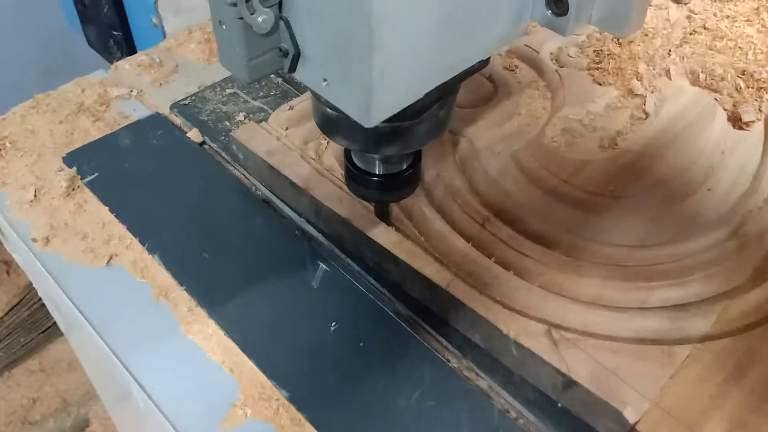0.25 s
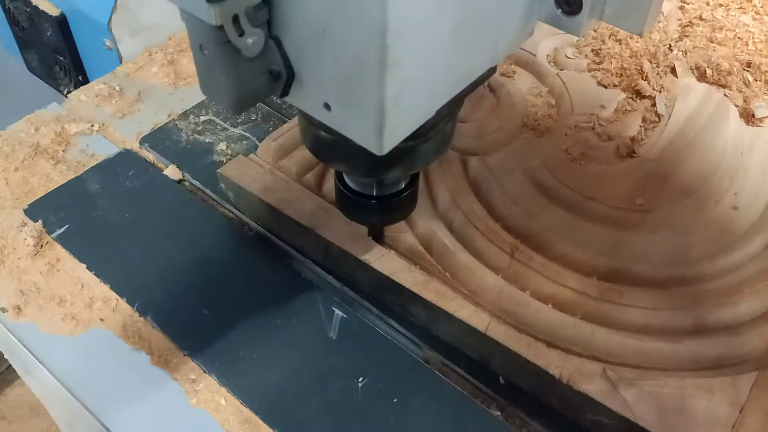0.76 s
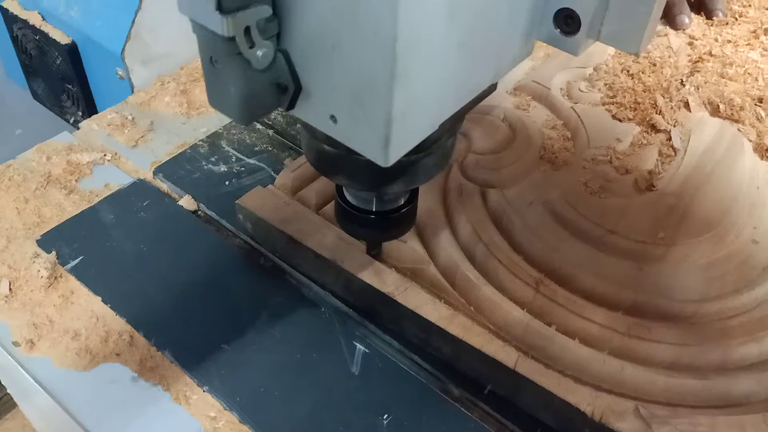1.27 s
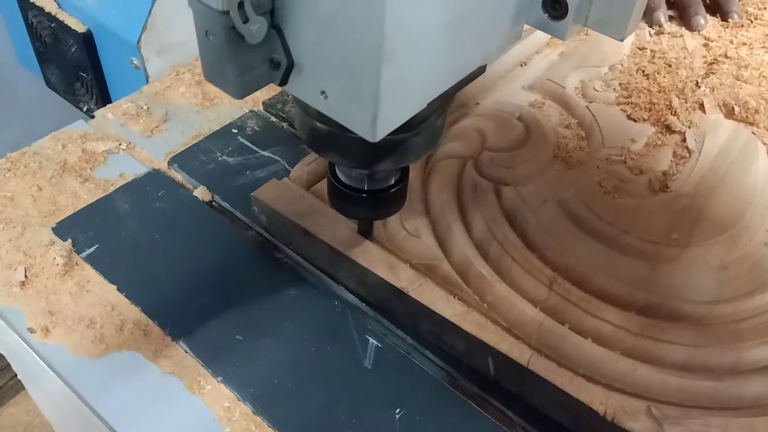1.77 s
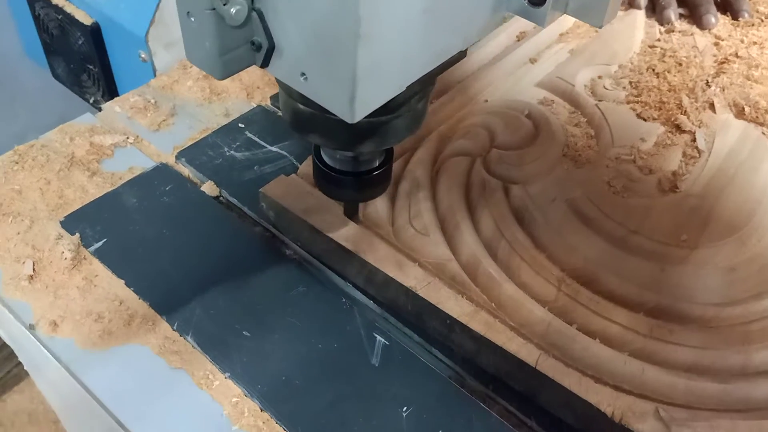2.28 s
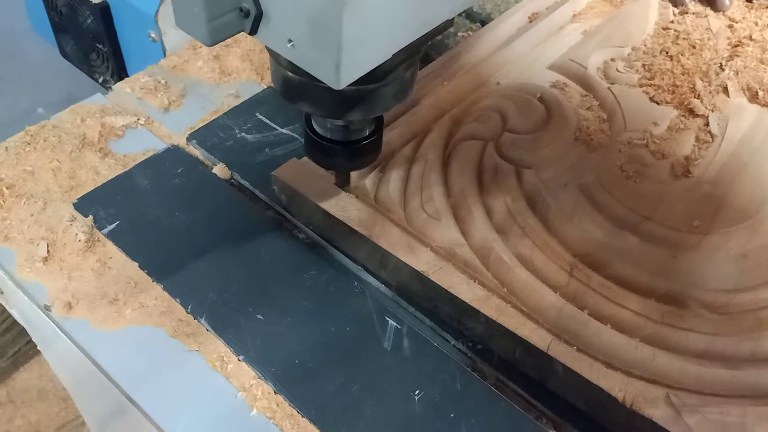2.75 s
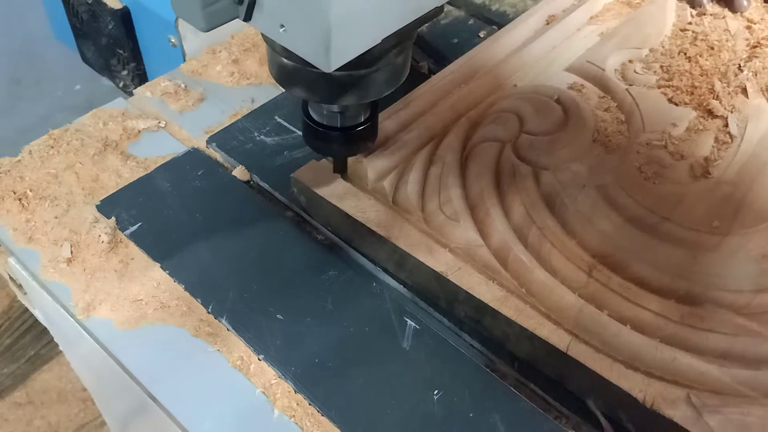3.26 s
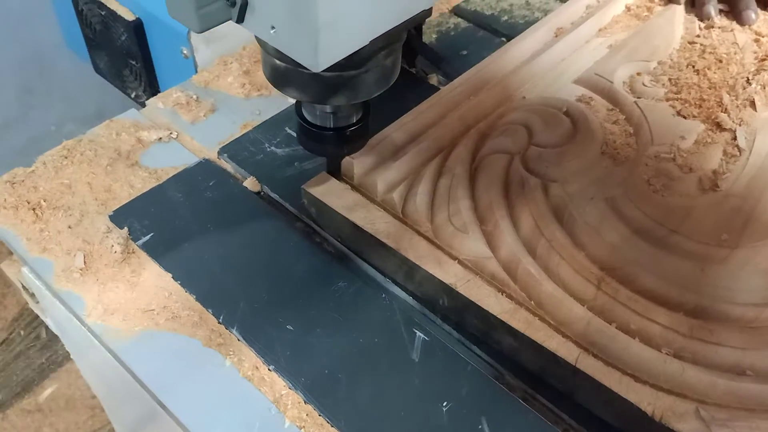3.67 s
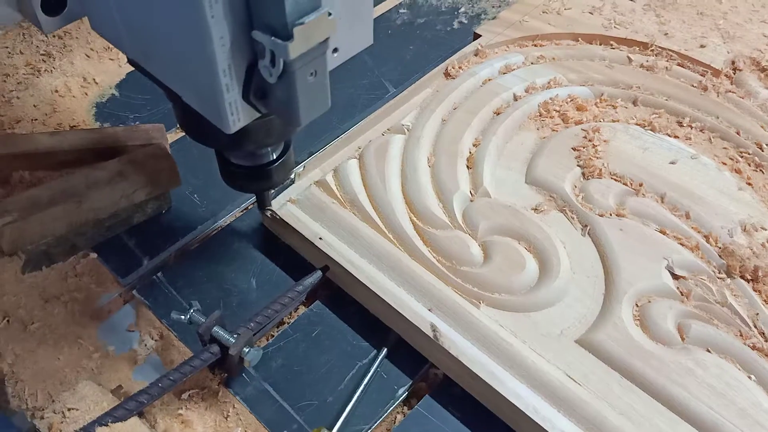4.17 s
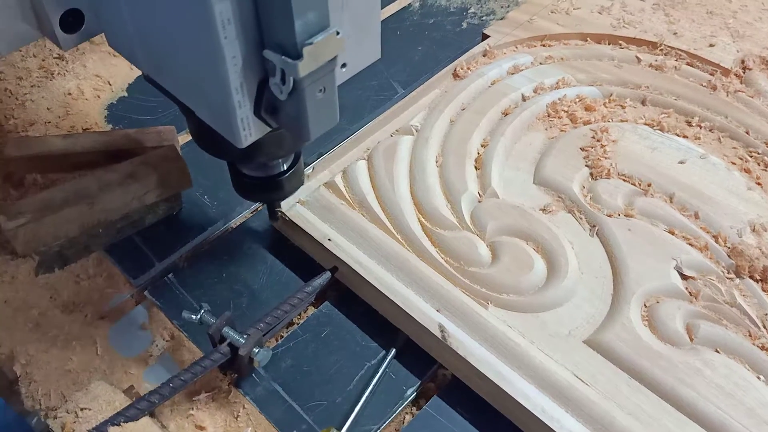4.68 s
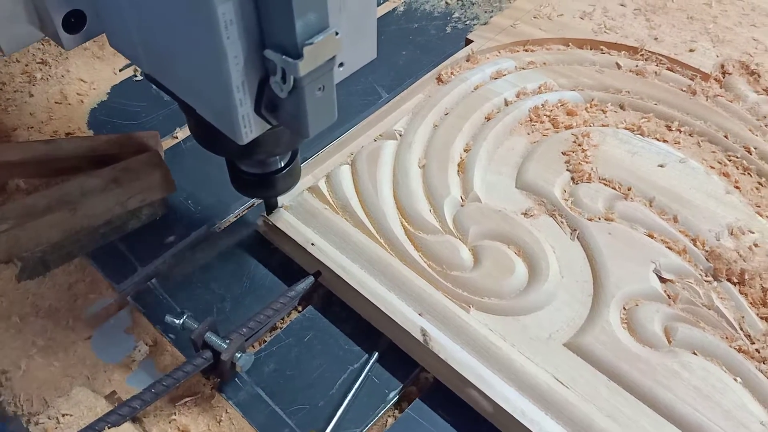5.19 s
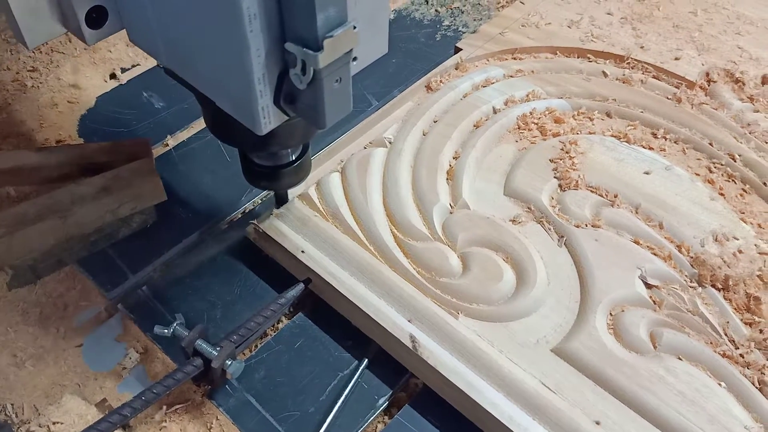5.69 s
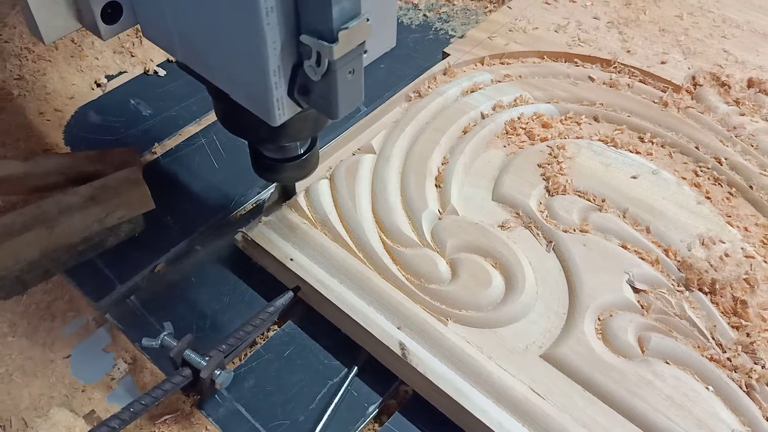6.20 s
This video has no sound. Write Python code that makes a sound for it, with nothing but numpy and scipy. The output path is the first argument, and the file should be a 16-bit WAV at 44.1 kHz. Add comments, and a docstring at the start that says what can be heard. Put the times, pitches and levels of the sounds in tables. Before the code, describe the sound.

Close stereo microphone at a wood-carving router. A hard, steady buzzing whine with tearing hiss cuts a board; the left side is muffled until it suddenly opens up. A thin squeal builds, sharp clicks with low thuds mark the bit breaking free, and the spindle spins quietly with airy hiss. Then it stutters into a second board and resumes a rough whine.

```python
"""A router spindle whines at the microphone's two ports, turning about 300 times a second: sine multiples
of the turn rate. Its two-fluted bit cuts the edge of a board, lifts clear, then plunges into a second board.
Under the whine, bands of noise make the hiss of motor air and torn fibres; resonances ring in board and housing.
A squeal, short clicks with low thuds and faint steady tones are added.
A finger covers the left port at first and then slides off, which brings that side's treble back."""
import sys
import numpy as np
from scipy import signal
from scipy.io import wavfile

SR = 44100
rng = np.random.default_rng(int(sys.argv[2]) if len(sys.argv) > 2 else 0)


def store_pcm(level_fs):
    """Save levels as 16-bit WAV."""
    pcm = np.round(np.clip(level_fs, -1, 1) * 32767).astype(np.int16)
    wavfile.write(sys.argv[1], SR, np.atleast_2d(pcm).T)


N = 284004
COARSE_S = np.arange(0, N + 40, 40) / SR    # time grid of the slow controls
SECOND_BOARD_S = 4.3    # from here on the second board's settings hold
CUTOFF_HZ = 15600       # top of the microphone's range
ROUGH_DB = 0.47         # spread of the fast flutter of every multiple

# Spindle speed, faster when free: (t/s, turn rate/Hz)
SPIN = [(0, 299.2), (3.7, 299.05), (3.85, 299.8), (4.7, 299.8), (4.73, 299.1), (6.44, 299.05)]


def spindle_angle():
    """The turn rate summed to an angle in rad, so that all multiples stay locked to one shaft."""
    return 2 * np.pi * np.cumsum(fine(in_time(SPIN))[0]) / SR


# Tooth pass, twice a turn, as each port hears it: (t/s, rms level/dB, left-right/dB, lag in the right port/rad)
TOOTH_PASS = [(0, -40, -27, 4), (.4, -37.5, -20, 1), (.55, -29, -14.5, 0.5), (1.3, -26, -8.5, 0),
              (1.6, -21, -1, 0.5), (2.0, -23.5, 0.5, 0.8), (2.45, -22, 0.1, 0.58), (3.67, -24.5, 0.5, 0.6),
              (3.7, -27, 2.5, 1.3), (3.8, -37.5, 5, -1.2), (3.86, -47.5, 4, -1), (4.05, -42, 1, 0.7),
              (4.69, -44, -3, -1), (4.705, -39, -2, 3), (4.722, -28, 0, 0.5), (4.74, -38, 1, -1),
              (4.752, -27, 1, 0.8), (4.777, -27.5, -1, 0), (4.793, -35, 2, 1.5), (4.815, -28.5, -1, -0.3),
              (4.838, -27, 2, 0), (4.865, -26, 0, -0.5), (4.9, -26.5, 0, -0.8), (4.925, -42, 3, 0),
              (4.95, -39, -18, -5), (4.985, -34, 3, -2), (5.0, -35, -4, -1), (5.012, -26, -6, -2),
              (5.025, -38, -8, -2), (5.038, -27, -9, -2), (5.052, -34, 4, -3.5), (5.11, -33, -7, -2),
              (5.4, -36, -6.5, -3), (5.7, -35.5, -10.5, -2.5), (5.79, -33.5, -3, -5), (5.94, -34, -7, -5),
              (6.1, -32, -3, -5), (6.44, -31, -3, -6)]


def tooth(turn):
    """The two flutes strike once a turn each, which gives the strongest line at twice the turn rate."""
    db, pan_db, lag = in_time(TOOTH_PASS)
    gain = from_db(db + ROUGH_DB * drift(32.0) + pan_db / 2 * [[1], [-1]])
    phase = 0.031 * drift(47) - lag * [[0], [1]]
    return np.sqrt(2) * fine(gain) * np.sin(2 * turn + fine(phase))


# How hard the bit bites, through full cut, lift, free run, plunge and first heavy pass:
# (t/s, level from a full cut/dB)
BITE = [(0, 1.2), (3.55, -0.5), (3.72, -2.5), (3.86, -9.5), (4.0, -41), (4.7, -20), (4.715, -3),
        (4.893, -5), (4.912, 5), (5.08, 3), (5.3, 0), (6.44, -1)]


def bite_db():
    """Strength of the cut over time, shared by whine, torn fibres and board."""
    return in_time(BITE)[0]


# How the lag in the right port creeps as the head travels:
# (multiple, rate on the first board/rad per s, rate on the second board/rad per s)
LAG_CREEP = [(1, 0, -0.3), (4, -0.7, -0.5), (5, -0.46, 1.1), (6, 2, -0.8), (7, 4.5, .2), (8, 0.5, 0.1),
             (9, -0.7, 2), (10, -1.9, 0.5), (11, 1.5, -1.5), (12, -1, -0.2), (13, 2, -2.2), (14, 1, 0),
             (15, -1, -0.36)]
# Travel from the middle of each pass: (t/s, time past the middle/s)
PASS_TIME = [(0, -.9), (1.7, -.9), (3.7, 1.1), (4.3, 1.1), (4.31, -.7), (4.9, -.7), (6.44, .84)]


def lag_creep(multiple, second):
    """Lag in rad that one multiple gains or loses as the head travels along the board."""
    lag = 0
    for m, first_rate, second_rate in LAG_CREEP:
        if round(m) == multiple:
            lag = lag + np.where(second, second_rate, first_rate) * in_time(PASS_TIME)[0]
    return lag


# One multiple swells or sinks for a while as the bit travels:
# (peak t/s, multiple, rise/s, fall/s, gain/dB, left-right/dB)
TRAVEL_SWELLS = [(0.0, 1, 0.05, 0.21, 3, 1), (0.0, 8, 0.05, 0.27, 6, -13), (.1, 11, 0.23, 0.44, 4, 0),
                 (.3, 5, 0.23, 0.27, 4, -7), (.7, 14, .4, .3, 5, -2), (.8, 12, 0.45, 0.24, 9, 7),
                 (0.15, 4, 0.82, 0.61, 3, 0), (0.4, 6, 0.91, 0.31, 11.5, 2), (0.5, 10, 0.74, 0.32, 7.5, -2),
                 (0.552, 3, 0.42, 0.48, 5, -4.5), (0.68, 13, 0.1, 0.45, 10.5, 0.5),
                 (.4, 17, 0.35, .4, 4, -7), (.4, 19, 0.28, 0.8, 4.5, -1), (0.65, 18, 0.9, 0.35, 4, -4),
                 (0.9, 10, 0.2, 0.13, -11, -2), (1.051, 7, 0.74, 0.34, 5, -4),
                 (1.052, 8, 0.46, 0.36, -13, 11), (1.5, 14, 0.55, .9, -15, -9), (.4, 12, 0.58, .5, 5.5, 1),
                 (1.45, 13, 0.56, 0.47, 4, -7.5), (1.3, 1, 0.93, 0.9, -9, 8), (1.45, 6, 0.67, 1, -3, 19),
                 (1.5, 12, 0.33, 1.7, 6, -10), (1.6, 8, 0.21, 1.1, 8.5, 0), (1.75, 8, 0.14, .08, 2.5, -2),
                 (1.7, 12, 0.16, 0.81, 0, -3), (1.899, 8, 0.1, 0.64, -11, -30),
                 (2.0, 1, 0.42, 0.61, -8.5, -18), (2.0, 4, 0.31, 0.44, -3, .1),
                 (2.05, 5, 0.51, 1.1, -9, -20), (2.3, 8, 0.24, 0.25, -2, -3), (2.4, 13, .4, 0.53, 1.5, -2),
                 (2.5, 6, 0.4, .3, -0.5, -5), (2.7, 5, 0.6, .6, 7.5, 1), (2.9, 10, 0.16, 0.46, 5, 5),
                 (3.2, 9, .6, 0.26, -5, 8), (3.5, 5, .3, .2, 5, -7), (3.5, 15, 0.36, .3, 0, 2),
                 (2.3, 17, 0.54, 1.8, -17, -20), (2.4, 7, 0.37, 0.56, -4, -6),
                 (2.5, 13, 0.52, 0.32, 1, 7.5), (2.55, 12, 0.13, 1.1, -10, 6), (2.7, 10, 0.46, 0.24, 5, 1),
                 (2.95, 6, 0.44, 0.56, 6, -3), (2.95, 8, 0.72, 0.79, 4, 10), (3.5, 10, 0.42, 0.39, -12, 11),
                 (3.5, 13, 0.41, 0.27, -16, -3), (3.6, 9, 0.52, 0.33, -9, 5), (3.55, 12, 0.33, .15, -3, 3),
                 (3.3, 7, 0.27, 0.27, 3.5, 3), (3.3, 10, 0.17, 0.074, 2, 1), (3.82, 6, 0.067, 0.018, 12, 6),
                 (3.85, 11, 0.15, 0.12, 20, 11), (3.775, 11, .025, .08, 10, .1), (3.8, 14, .15, .2, 8, .1),
                 (3.85, 4, 0.73, 0.044, -5.5, 10), (3.95, 1, 0.16, 0.18, 10, 4),
                 (4.4, 1, 0.35, 0.22, -3.5, 15), (4.73, 9, 0.027, 0.69, 8.5, 7),
                 (4.74, 1, 0.057, 0.19, 10.5, 6), (4.8, 4, 0.2, 0.24, -9.5, 11),
                 (4.85, 3, 0.15, 0.038, 4, -9), (4.84, 8, 0.04, 0.045, 4.5, -2), (4.97, 8, .04, .06, 2, .1),
                 (1.59, 8, .02, .05, 3, .1), (4.88, 1, 0.086, 0.042, 6, 6), (4.89, 13, 0.033, 0.047, 7, 3),
                 (4.91, 8, 0.02, 1.4, 9.5, 3.5), (4.9, 11, 0.03, 0.053, -3, -7),
                 (4.885, 12, 0.02, 0.061, 15.5, 4), (4.9, 6, .05, .2, -1.5, -7),
                 (4.97, 14, 0.027, 0.28, 2.5, -2), (4.92, 9, 0.046, 0.095, -13, -2),
                 (5.02, 13, 0.066, 0.19, 7, -3), (5.05, 8, 0.22, 0.14, 3, 0),
                 (4.72, 8, .012, 0.016, 10, .1), (4.755, 8, 0.012, 0.024, 9, .1),
                 (4.98, 4, 0.027, .04, 6, 1), (5.25, 9, 0.13, 0.18, 6.5, 4), (5.25, 7, 0.13, .15, -3.5, -2),
                 (5.199, 5, 0.12, 0.33, 3.5, 4), (4.95, 3, 0.06, 0.26, -17, 11),
                 (4.95, 10, 0.39, 0.32, 5.5, -3), (5.0, 14, 0.38, 0.44, 4, 1),
                 (5.08, 9, 0.11, 0.38, 4.5, -2), (5.1, 15, 0.16, 0.23, 4, 3),
                 (5.18, 12, 0.27, 0.07, 8.5, -1), (5.1, 4, 0.17, .25, -1, 6.5),
                 (6.0, 4, 0.36, 0.57, 2.5, -1), (5.2, 6, 0.14, 0.11, -9, 4),
                 (5.43, 14, 0.029, 0.022, 13, 0.1), (5.45, 11, 0.039, 0.22, -3.5, -23),
                 (5.5, 4, 0.5, 0.47, 4.5, 3.5), (5.5, 8, 0.13, 0.079, -7.5, 2.7),
                 (5.55, 14, 0.13, 0.52, -10.3, -5), (5.65, 15, .1, .12, 2, -2), (5.8, 16, .07, 0.08, 5, .1),
                 (5.25, 15, .1, .08, 6, .1), (6.05, 11, 0.093, .2, 1, -1), (5.62, 8, .07, 0.18, 0, .1),
                 (5.8, 10, 0.088, 0.34, -4, -13), (5.95, 13, 0.27, 0.13, -21, 3),
                 (6.0, 6, 0.4, 0.52, 8, -3.5), (6.08, 13, 0.057, 0.5, 1, 0), (6.1, 12, 0.091, 0.13, 5, 1.5),
                 (6.15, 10, 0.1, 1.3, -3.5, 14), (6.17, 16, 0.097, 0.26, 3, 2),
                 (6.301, 8, 0.26, 0.39, -11, 15), (6.3, 17, 0.15, 0.5, -1, 9),
                 (6.35, 7, 0.39, 1.3, -5.5, -6), (1.7, 10, .15, 0.29, -7, -2), (1.8, 15, .3, .5, -11, -3),
                 (1.7, 19, .15, .2, 6, .1), (1.7, 20, .2, .3, -6, .1), (2.9, 15, .5, .4, 5, 2),
                 (2.9, 17, .5, .5, 6, .1), (2.7, 23, 1.0, .8, -6, 1), (4.8, 7, 0.15, .12, -8, -4),
                 (4.8, 6, .1, .1, -6, .1), (4.8, 10, .08, .08, 6, 1), (5.0, 10, 0.12, .3, -4, .1),
                 (4.78, 15, .06, .1, 4, .1), (5.0, 16, 0.22, .45, -5, .1), (5.4, 15, .25, .4, 4, 1),
                 (5.2, 18, .15, .15, 4, .1), (5.4, 13, .12, 0.11, -5, .1), (5.45, 17, .25, 0.71, -4, 2),
                 (5.6, 16, .15, .15, -7, .1), (5.6, 20, .3, .2, 4, .1), (6.3, 6, .2, .4, 3, -0.5),
                 (6.3, 11, .2, .4, -5, .1), (6.3, 12, .2, .4, 6, .1), (6.3, 19, .15, .3, 5, .1),
                 (6.15, 22, .08, .3, 7, .1), (6.4, 23, .15, 0.18, 8, .1), (6.15, 16, .06, .1, 3.5, 1),
                 (6.3, 18, .15, .3, -5, .1), (1.05, 12, .3, .25, 5, .1), (.1, 12, .08, .1, -4, .1),
                 (.02, 13, .05, .06, 6, .1), (.2, 13, .12, .15, -4, .1), (1.84, 13, .08, .08, -7, .1),
                 (1.3, 11, .1, .12, -3, .1), (6.28, 14, .1, .15, 4, .1), (5.83, 14, .06, .08, 3, .1),
                 (5.97, 12, .1, .07, -6, .1), (5.37, 12, .05, .04, -3, .1), (5.45, 12, .04, .05, 4, .1),
                 (5.52, 11, .12, .1, -4, .1), (5.9, 11, .08, .08, 3, .1), (5.45, 10, .05, .06, 4, .1),
                 (5.97, 9, .08, .05, 3, .1)]


def travel_swells(multiple):
    """Summed level and left-right change in dB of one multiple as the bit travels."""
    swell_db, swell_pan_db = 0, 0
    for peak, m, rise, fall, gain_db, pan_db in TRAVEL_SWELLS:
        if round(m) == multiple:
            swell = hump(peak, rise, fall)
            swell_db = swell_db + gain_db * swell
            swell_pan_db = swell_pan_db + pan_db * swell
    return swell_db, swell_pan_db


TOP_FROM = 15       # first multiple that follows TOP_LEVEL
FLICKER_DB = 0.7    # the short waves of the upper multiples flicker
# What each board makes of a multiple in a full cut: (multiple, then for the first board rms level/dB,
# left-right/dB, lag in the right port/rad, and the same three for the second board)
BOARD_MULTIPLES = [(1, -52, -1.5, 0.61, -44, -4, 0.54), (3, -40.5, -3.5, -0.67, -40, -1, -1.4),
                   (4, -37, -5.5, 0.83, -37, 1.5, -1.26), (5, -42, 8.5, -2.5, -44, -11.5, -0.14),
                   (6, -43.5, 0, -1.2, -39.5, 0, 4), (7, -45.5, 7.5, 3, -36, -6.5, -1),
                   (8, -46, 6, -0.8, -37, -3.5, 0.07), (9, -44.5, 3.5, -.5, -47, -3, 0.6),
                   (10, -45.5, -2, 0.3, -40.5, 3.5, 4), (11, -53, -8.5, 0.25, -49, 16.5, 2),
                   (12, -48.5, 9, 0.85, -51, 11, 1.1), (13, -47, 5.5, 3.5, -51.5, 16.5, 2),
                   (14, -53.5, 9, -0.5, -50.5, 5.5, 1.5), (15, -61.5, 14, -1, -53, 11, 2),
                   (16, -77, 4.7, 1.5, -54, 10.5, 1), (17, -65, 1, -0.5, -54.5, 14, 3),
                   (18, -64.5, 2, -3.5, -61, 11, 0), (19, -58, 8, 3.5, -62, 15, -1),
                   (20, -62, 11, -0.5, -62.5, 23, 2), (21, -63, -6, -4, -62, 10, -4),
                   (22, -68, 5, -1, -65, 0, -4.5), (23, -57.5, 14, 4, -65.7, 0.7, -1.5),
                   (24, -54, 9.5, 1.7, -64, -6, -2.5), (25, -60, 13, -1.5, -76, -2, -6),
                   (26, -62, 15, 2, -75, -5, -8), (27, -64, 4, -1.5, -69, -4, 4.5),
                   (28, -63, -2, 3.5, -73, -6, 3), (29, -64, 3, 2, -69, -7, -4),
                   (30, -63.5, -3, 2, -80, -1.9, 0), (31, -63, -1, 4, -69, -5, -3.5),
                   (32, -77, -4.5, -0.5, -80.0, -10.7, 2)]
# Spindle running free: (multiple, rms level/dB)
FREE_RUN = [(1, -55), (3, -55.5), (4, -103), (5, -57), (6, -68), (9, -54.5), (12, -67.5), (32, -83)]
# Level of the highest multiples: (t/s, gain/dB)
TOP_LEVEL = [(0, 5), (1.6, 5.5), (1.85, -0.5), (3.4, -1), (3.85, 9), (4.7, 6), (5.2, -4), (5.4, -1),
             (6.0, -1.5), (6.12, 5), (6.44, 8)]


def whine(turn, wander_db=0.4, wander_rad=0.06):
    """Other multiples of the turn rate; as the head travels, room paths shift level and phase in each port."""
    cut_db = bite_db()
    second = COARSE_S > SECOND_BOARD_S
    out = 0
    for k, *boards in BOARD_MULTIPLES:
        k = round(k)
        level_db, pan_db, lag = np.where(second, np.c_[boards[3:]], np.c_[boards[:3]])
        lag = lag + lag_creep(k, second)
        swell_db, swell_pan_db = travel_swells(k)
        swell_db = swell_db + in_time(TOP_LEVEL)[0] * (k >= TOP_FROM)
        level = np.hypot(from_db(level_db + cut_db), from_db(at_hz(FREE_RUN, k)))
        level = level * from_db(swell_db + ROUGH_DB * drift(21))
        spread = np.clip(0.17 * k, 0, 1.3)      # shorter waves feel the travel more
        shift_db = spread * (wander_db * drift(1.2, channels=2) + FLICKER_DB * spread * drift(18.0))
        gain = ports(k * SPIN[0][1], pan_db + swell_pan_db) * from_db(shift_db)
        phase = rng.uniform(0, 2 * np.pi) + 0.016 * drift(44) - lag * [[0], [1]]
        phase = phase + spread * wander_rad * drift(0.42, channels=2)
        out = out + np.sqrt(2) * fine(gain * level) * np.sin(k * turn + fine(phase))
    return out


# Bit chattering as it leaves the wood: (t/s, rms level of the centre line/dB)
CHATTER = [(3.28, -57), (3.36, -50), (3.45, -44), (3.59, -40.5), (3.66, -47.5), (3.75, -60)]
# Lines around the squeal: (turn rates off centre, level from the centre line/dB)
CHATTER_LINES = {-3: -3, -2: -11, -1: -6, 0: 0, 1: -6, 2: -6}.items()


def squeal(turn, centre_hz=3772):
    """A self-excited ring of the bit, beaten once a turn into side lines."""
    t = np.arange(N) / SR
    ring = 2 * np.pi * centre_hz * t + 0.12 * fine(drift(8))
    lines = sum(from_db(db) * np.sin(ring + k * turn + rng.uniform(0, 2 * np.pi)) for k, db in CHATTER_LINES)
    sounding = (t > CHATTER[0][0]) & (t < CHATTER[-1][0])
    return np.sqrt(2) * fine(from_db(in_time(CHATTER))) * lines * sounding


# Flares of the noise, swells while cutting and a short broad whoosh at the break near 3.68 s:
# (peak t/s, rise/s, fall/s, then gain/dB at each pitch of FLARE_PITCHES)
NOISE_FLARES = [(.1, .6, 0.92, 11, 6, 3, 3.2, 2.5, 0.3), (1.63, 0.078, 0.14, 0.3, 5, 3, 3.4, .1, 2.2),
                (3.62, 0.29, 0.24, 4, 0.033, .1, .4, 1.5, 6), (3.679, 0.015, 0.025, 6, 8, 3, .3, .3, 8.9),
                (4.725, 0.038, 0.2, 0, 26, 14, 5.1, 6.1, 4.6), (4.855, 0.015, .04, 2, 8, 6, 1.2, .2, .2),
                (4.97, 0.24, 0.24, 14, 22, 12, 4.8, 6.4, 7.7),
                (6.11, 0.037, .09, -2, -5, -2, 0.42, 2.4, 13), (6.3, .2, 1.2, -7, -5, -2, .1, 2.5, 4.7)]
# Pitches of the flare gains: (f/Hz)
FLARE_PITCHES = [90, 300, 800, 1800, 4500, 12000]


def flare_db(hz):
    """Gain of the noise at one pitch, summed over all flares."""
    total_db = 0
    for peak, rise, fall, *gains_db in NOISE_FLARES:
        total_db = total_db + hump(peak, rise, fall) * np.interp(np.log(hz), np.log(FLARE_PITCHES), gains_db)
    return total_db


AIR_DB = -36            # rms level of all the air noise, before the finger and left-right balance
TEAR_WANDER_DB = 1.5    # slow wander of the tearing in each band
HISS_LOW_HZ = 72.6      # low cut of the hiss
# Fibres tearing in a full cut: (f/Hz, first board level/dB per Hz, second board level/dB per Hz)
FIBRES = [(123, -91.5, -92.5), (446, -84, -92), (990, -76, -81), (1350, -75.5, -76.5), (1780, -75, -72.5),
          (2350, -70.5, -72), (4010, -79.5, -78.5), (7300, -87.5, -86), (10900, -90, -104),
          (13500, -92.5, -89.5)]
# How far the tearing follows the bite: (f/Hz, share of the bite's dB)
FIBRES_FOLLOW = [(120, -0.24), (500, 0.4), (1200, 0.03), (2300, 0.03), (4500, 0.1), (12000, 0.1)]
# Spectrum of motor and fan running free, only its shape counts: (f/Hz, relative level/dB per Hz)
MOTOR_AIR = [(18, -66), (30, -73), (114, -26.5), (270, -18), (299, -66), (341, -71), (591, 14), (639, -5),
             (691, -9.5), (1200, -42), (1330, 0.5), (2240, -16.5), (4310, -23.5), (7270, -11), (15500, -48)]
# Balance of the hiss between the ports: (f/Hz, left-right/dB)
HISS_BALANCE = [(60, 2), (150, -1), (300, 0), (900, -4.5), (1200, 1), (1800, -1.5), (2400, 3), (3600, 4),
                (7000, 1.5), (15000, 3.5)]


def hiss(turn, patchy_db=1.0, gate=0.043):
    """Third-octave bands of motor air plus torn fibres, which pulse with each tooth and each turn."""
    cut_db = bite_db()
    second = COARSE_S > SECOND_BOARD_S
    fibres = np.array(FIBRES)
    teeth = 1 + gate * np.cos(2 * turn) + 0.12 * np.cos(turn)
    grid = np.arange(30, CUTOFF_HZ)
    air_db = AIR_DB - 10 * np.log10(np.sum(from_db(2 * at_hz(MOTOR_AIR, grid))))
    out, together = 0, drift(5)
    edges = 28 * 2 ** (np.arange(29) / 3)
    white = rng.standard_normal((2, 2, N))      # neighbouring bands take turns
    for k, (a, b) in enumerate(zip(edges, edges[1:])):
        band = signal.butter(2, [a, b], "band", fs=SR, output="sos")
        mid, side = signal.sosfilt(band, white[k % 2])
        hz = np.sqrt(a * b)
        tear_db = np.where(second, at_hz(fibres[:, ::2], hz), at_hz(fibres, hz))
        tear_db = tear_db + at_hz(FIBRES_FOLLOW, hz) * cut_db
        tear = from_db(tear_db + flare_db(hz) + TEAR_WANDER_DB * drift(5.7))
        level = np.hypot(from_db(air_db + at_hz(MOTOR_AIR, hz)), fine(tear) * teeth)
        patches = from_db(patchy_db * (0.067 * together + drift(23)))
        gain = fine(ports(hz, at_hz(HISS_BALANCE, hz)) * patches)
        out = out + level * gain * blend(mid, side, hz)
    out = signal.sosfilt(signal.butter(2, HISS_LOW_HZ, "high", fs=SR, output="sos"), out)
    return out * np.sqrt(SR / 4)      # dB per Hz to white-noise gain


BOARD_FOLLOWS_CUT, BOARD_FOLLOWS_FLARE = 0.13, 1.92     # shares of their dB
# Resonances under the cut, before the ring follows cut and flares:
# (f/Hz, width/Hz, first board rms level/dB, second board rms level/dB)
BOARD_RINGS = [(631, 174, -51, -45.5), (760, 130, -60, -61), (2060, 90, -56, -50), (2235, 110, -50, -44.5),
               (2360, 120, -50, -48), (2580, 170, -50, -50)]


def board():
    """The board's resonances ring in noise that follows the cut and the noise flares."""
    follow_db = BOARD_FOLLOWS_CUT * bite_db() + BOARD_FOLLOWS_FLARE * flare_db(FLARE_PITCHES[3])
    second = COARSE_S > SECOND_BOARD_S
    out = 0
    for hz, width, first_db, second_db in BOARD_RINGS:
        level = from_db(follow_db + np.where(second, second_db, first_db))
        out = out + fine(level) * ringing([(hz, width, 0)])
    return out


HOUSING_DB = -43.5      # level added to every housing mode
# Air noise ringing in the machine: (f/Hz, width/Hz, relative level/dB)
HOUSING_RINGS = [(586, 13, -16.5), (929, 130, -8.5), (1376, 190, -10), (2183, 110, -3.5), (2780, 650, 2.5)]


def housing():
    """Air noise excites the resonances of the machine's housing at a steady level."""
    return from_db(HOUSING_DB) * ringing(HOUSING_RINGS)


# Reflections near the machine: (f/Hz, width/Hz, gain of the peak or dip/dB)
REFLECTIONS = [(1700, 70, -2), (1880, 70, -3), (2460, 60, -1), (2545, 40, -2), (2760, 110, 0),
               (2930, 60, -2.5), (3120, 80, -3), (3250, 90, 3), (3450, 180, -4.5), (3850, 90, 4),
               (4060, 140, -1.5), (4700, 250, .5)]


def coloured(x):
    """Reflections near the machine colour all noise, as narrow peaks and dips in a row."""
    for hz, width, db in REFLECTIONS:
        x = x + (from_db(db) - 1) * resonance(x, hz, width)
    return x


CRACK_HZ, CRACK_S, CRACK_NOISE = 2000, 0.00041, 0.33   # ring, decay time constant, noise beside the ring
# Low modes of the thud: (f/Hz, relative level/dB, t60/s)
THUD_MODES = [(75, -16, .04), (115, -3, 0.05), (254, 1, 0.03), (410, -4, .03)]
# Short clicks with low thuds, at a break near 3.68 s and during the plunge:
# (t/s, low thud level/dB, crack level/dB, left-right/dB)
CLICKS = [(3.669, -44, -17, 8), (3.6755, -39, -15, 13), (3.683, -35, -20, 3), (4.716, -55, -24, .1),
          (4.753, -52, -22, -2), (4.853, -38, -26, -5), (4.875, -44, -32, .1), (4.911, -44, -32, .1),
          (4.94, -50, -34, .1)]


def clicks():
    """Each click is a sharp crack of ring and noise over a low thud of decaying sines."""
    out = np.zeros((2, N))
    t = np.arange(6000) / SR
    thud = sum(from_db(db - 60 * t / t60) * np.sin(2 * np.pi * hz * t) for hz, db, t60 in THUD_MODES)
    for s, thud_db, crack_db, pan_db in CLICKS:
        crack = np.sin(2 * np.pi * CRACK_HZ * t) + CRACK_NOISE * rng.standard_normal((2, len(t)))
        crack = crack * np.exp(-t / CRACK_S)
        click = from_db(thud_db) * thud + from_db(crack_db) * crack
        i = round(s * SR)
        out[:, i:i + len(t)] += from_db([[pan_db / 2], [-pan_db / 2]]) * click
    return out


# Faint steady tones: low hums, and thin lines, some about 49 Hz beside multiples of the whine:
# (f/Hz, rms level/dB, from t/s, to t/s)
STEADY_TONES = [(70, -63, -1, .68), (98, -71, -1, 4.7), (102.6, -71, -1, 4.7), (50, -73, 5.1, 7),
                (80, -69, 4.72, 5.08), (463, -60, -1, 7), (484.5, -58, 1.5, 3.7), (647.3, -57, -1, 4.7),
                (646.3, -51, 5.1, 7), (14190, -79, .5, 2.2), (2169, -57, .5, 3.7), (2616, -54, 0, 3.7),
                (3537, -62, .5, 3.4), (3838, -61, .5, 3.4), (4700, -64, 4.9, 7)]


def faint_tones():
    """Steady sine tones, wavering a little in level and phase."""
    t = np.arange(N) / SR
    out = 0
    for hz, db, start, end in STEADY_TONES:
        level = fine(between(start, end, 0.11) * ports(hz) * from_db(db + 1.0 * drift(5.7)))
        out = out + np.sqrt(2) * level * np.sin(2 * np.pi * hz * t + 1.16 * fine(drift(1.9)))
    return out


TREBLE_HZ = 4500    # above this the treble column of FINGER holds
# Finger on the left port: (t/s, share shut for low and middle pitches, share shut for the treble)
FINGER = [(0, 1.36, 1.2), (.5, 1.75, 1.17), (1.1, 1.8, 1.15), (1.4, 1.27, 0.96), (1.55, 0.97, 0.86),
          (1.59, 0.42, 0.88), (1.62, 0, 0.14), (1.76, 0.12, 0.2), (1.8, 0.013, 0), (6.44, 0.033, 0.11)]
# What the finger takes at a share of 1: (f/Hz, gain/dB)
FINGER_LOSS = [(60, -2.5), (380, 0), (700, -7), (1300, -13.5), (2400, -11), (4000, -18.5), (7000, -41),
               (12000, -29)]


def ports(hz, pan_db=0.):
    """Gains of the left and right port at one pitch: pan, and the finger's loss on the left."""
    shut = in_time(FINGER)[int(hz > TREBLE_HZ)]
    left_db = pan_db / 2 + np.clip(shut, 0, 2) * at_hz(FINGER_LOSS, hz)
    right_db = -pan_db / 2 + 0 * shut
    return from_db([left_db, right_db])


# How alike noise is in the two ports: (f/Hz, left-right likeness from -1 to 1)
PORT_LIKENESS = [(60, 0.69), (130, 1), (250, 0.85), (550, 0.79), (1650, -0.04), (4970, -0.0014),
                 (15000, -0.097)]


def blend(mid, side, hz):
    """Two noises become left and right, as alike as the room leaves them at this pitch."""
    alike = np.clip(at_hz(PORT_LIKENESS, hz), -1, 1)
    return np.sqrt(1 + alike) * mid + np.sqrt(1 - alike) * side * [[1], [-1]]


def pair(hz):
    """White noise in both ports, with the room's likeness at one pitch."""
    mid, side = rng.standard_normal((2, N))
    return blend(mid, side, hz) / np.sqrt(2)


def resonance(x, hz, width):
    """Two-pole peak of gain 1."""
    r = np.exp(-np.pi * width / SR)
    zeros = np.array([1, 0, -1]) * (1 - r * r) / 2
    return signal.lfilter(zeros, [1, -2 * r * np.cos(2 * np.pi * hz / SR), r * r], x)


def ringing(modes):
    """Noise goes twice through each resonance, is scaled to rms 1, then takes the mode's level and the ports'."""
    out = 0
    for hz, width, db in modes:
        ring = resonance(resonance(pair(hz), hz, width), hz, width)
        out = out + from_db(db) * fine(ports(hz)) * rms_one(ring)
    return out


def from_db(db):
    """dB to gain."""
    return 10 ** (np.asarray(db) / 20)


def rms_one(x):
    """Scale to rms 1."""
    return x / np.sqrt(np.mean(x ** 2) + 1e-20)


def in_time(rows):
    """Columns of a curve on the slow time grid; the ends are held."""
    s, *columns = np.transpose(rows)
    return np.array([np.interp(COARSE_S, s, c) for c in columns])


def at_hz(points, hz):
    """A spectrum read on a log-frequency axis."""
    points = np.array(points)
    return np.interp(np.log(hz), np.log(points[:, 0]), points[:, 1])


def fine(rows):
    """Slow controls filled in to every sample."""
    return np.array([np.interp(np.arange(N) / SR, COARSE_S, row) for row in np.atleast_2d(rows)])


def drift(rate, channels=1):
    """Slow chance of spread 1: noise through two equal poles at the rate in Hz."""
    r = np.exp(-2 * np.pi * rate * 40 / SR)     # one step of the grid is 40 samples
    noise = rng.standard_normal((channels, len(COARSE_S) + 2000))
    slow = signal.lfilter([1], [1, -2 * r, r * r], noise)[:, 2000:]     # drop the settling
    return slow / slow.std(axis=1, keepdims=True)


def between(start, end, fade_s):
    """0 outside a span, 1 inside, with short ramps."""
    return np.clip(np.minimum(COARSE_S - start, end - COARSE_S) / fade_s, 0, 1)


def hump(peak, rise, fall):
    """Rises from 0 to 1 and falls back, each over at least 5 ms."""
    return np.interp(COARSE_S, [peak - max(rise, .005), peak, peak + max(fall, .005)], [0, 1, 0])


def scene():
    """All sources as they reach the two ports."""
    turn = spindle_angle()
    noise = coloured(hiss(turn) + housing() + board())
    return tooth(turn) + whine(turn) + noise + squeal(turn) + clicks() + faint_tones()


def record(dry, low_hz=35.5):
    """The microphone drops the deep bass; the top is cut."""
    wet = signal.sosfilt(signal.butter(2, low_hz, "high", fs=SR, output="sos"), dry)
    return signal.sosfilt(signal.cheby2(18, 70, CUTOFF_HZ * 1.004, fs=SR, output="sos"), wet)


dry = scene()
out = record(dry)
store_pcm(out)
```